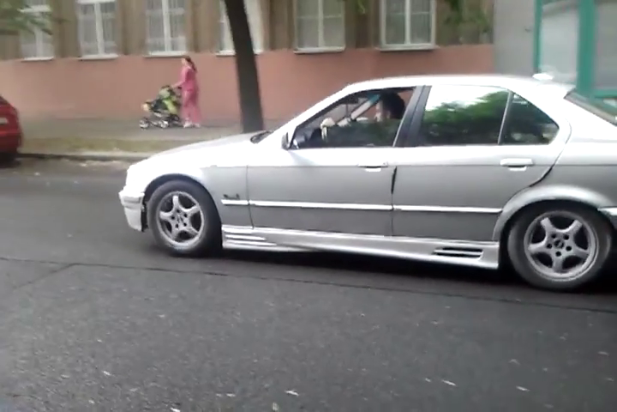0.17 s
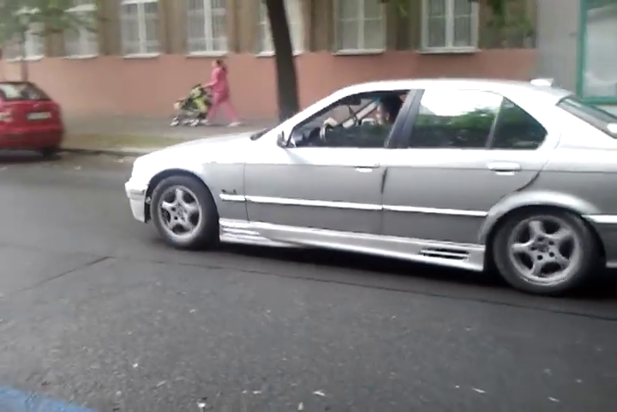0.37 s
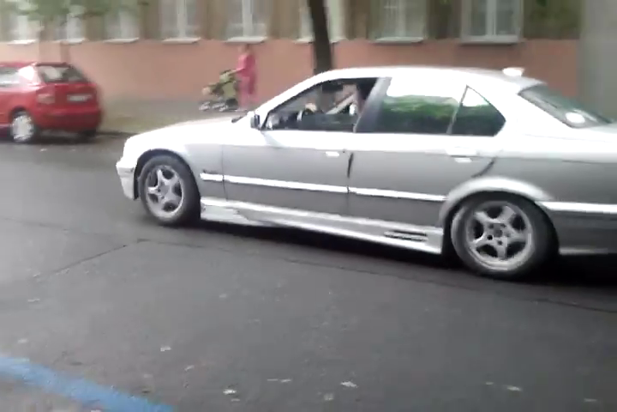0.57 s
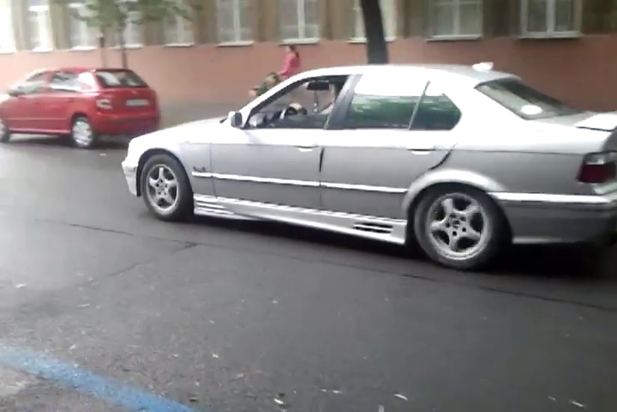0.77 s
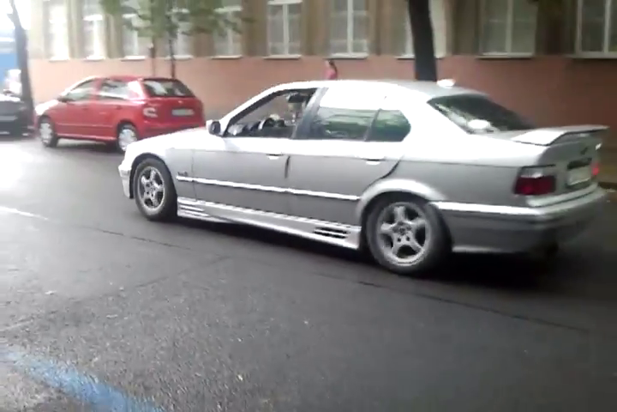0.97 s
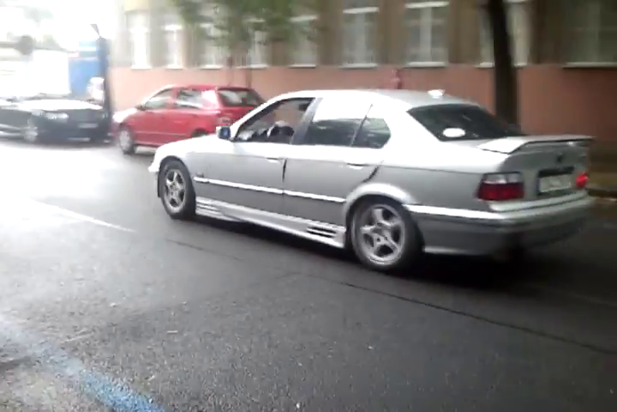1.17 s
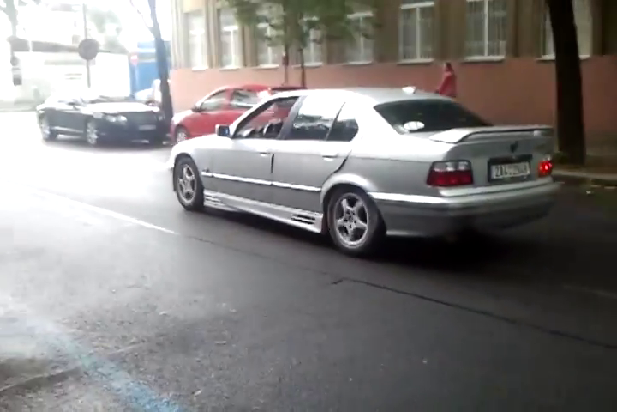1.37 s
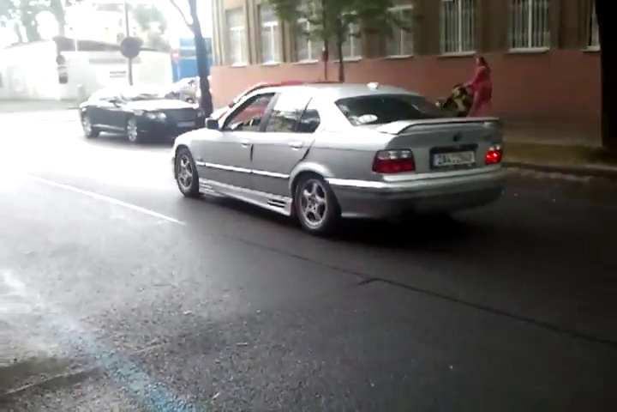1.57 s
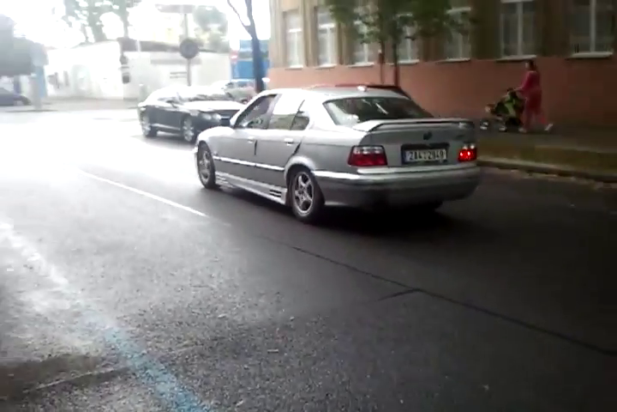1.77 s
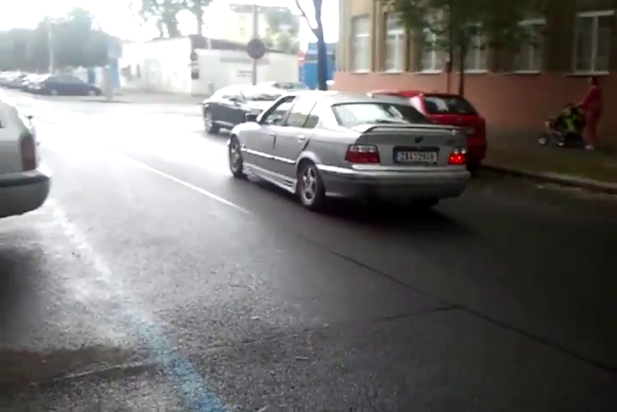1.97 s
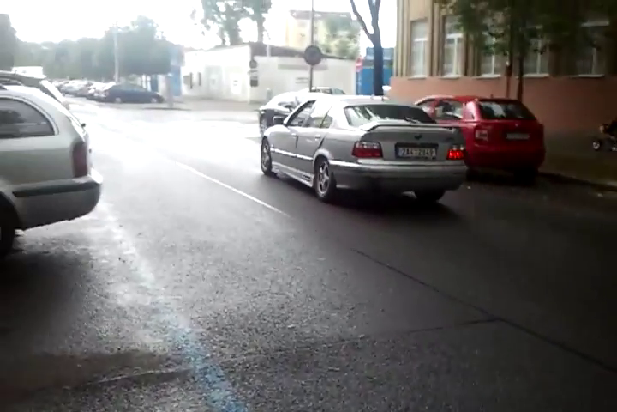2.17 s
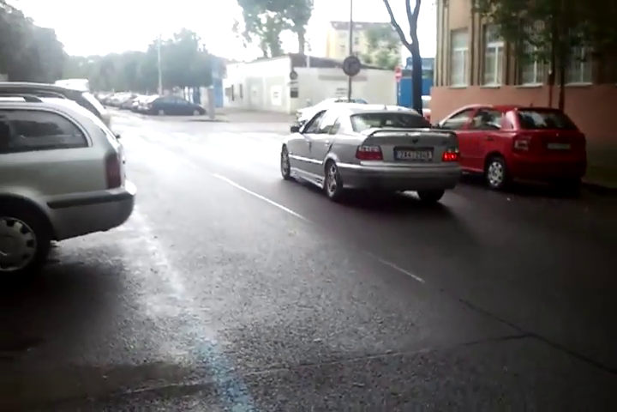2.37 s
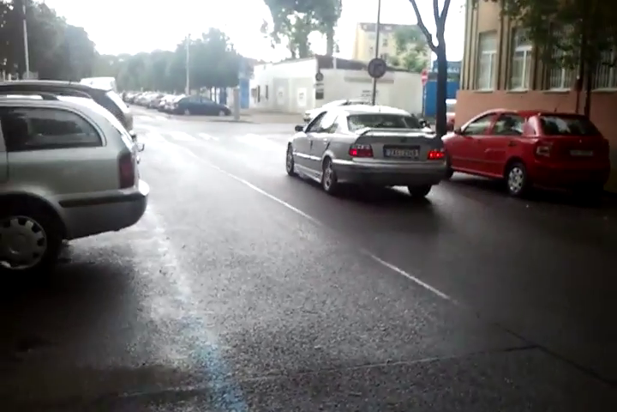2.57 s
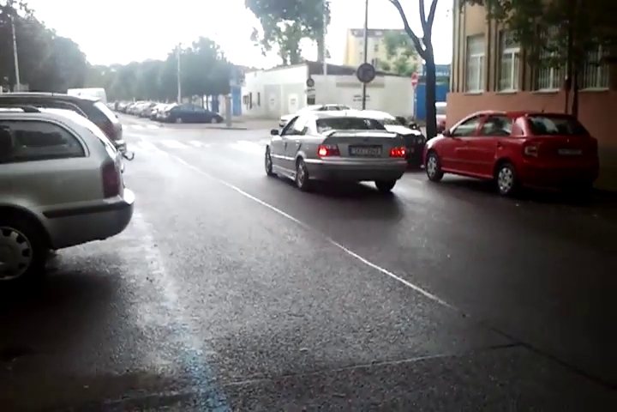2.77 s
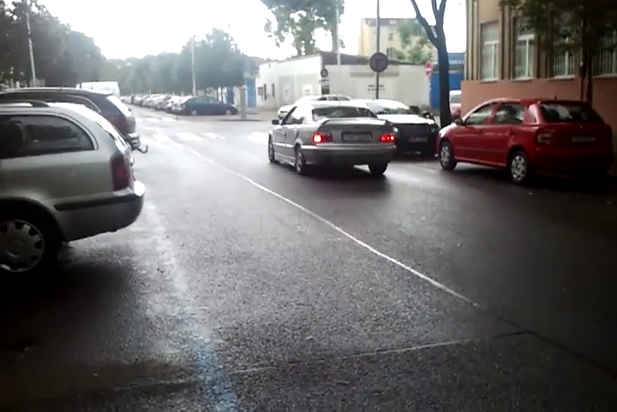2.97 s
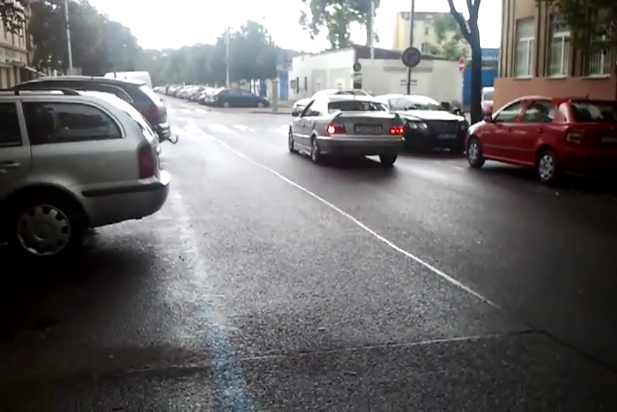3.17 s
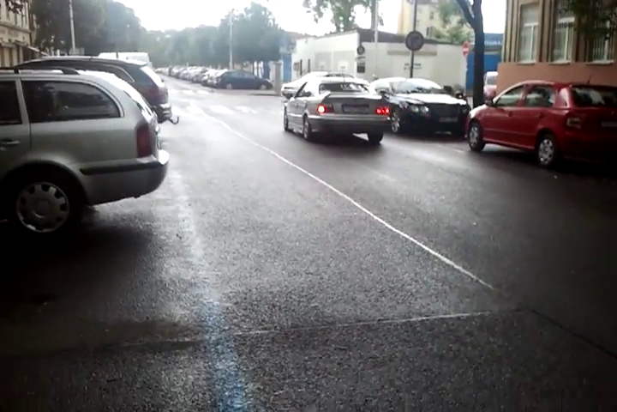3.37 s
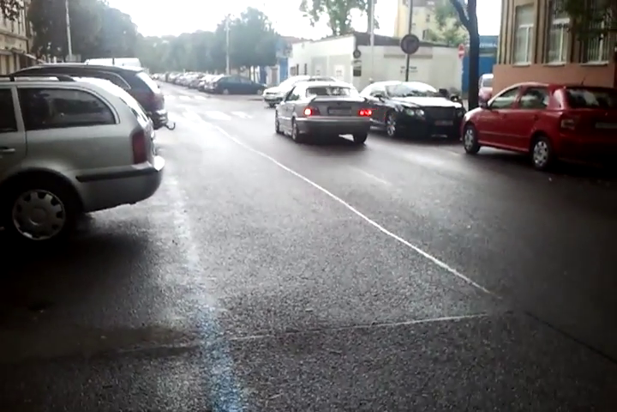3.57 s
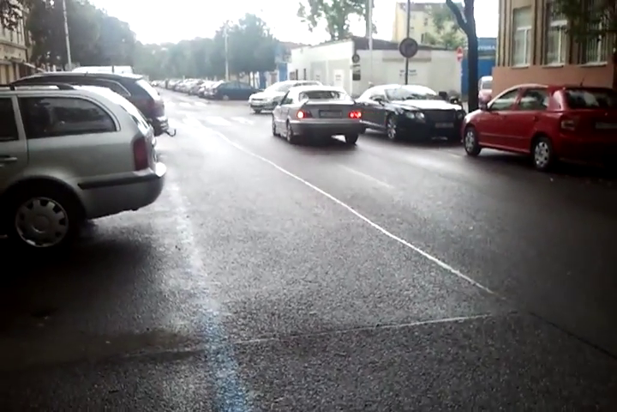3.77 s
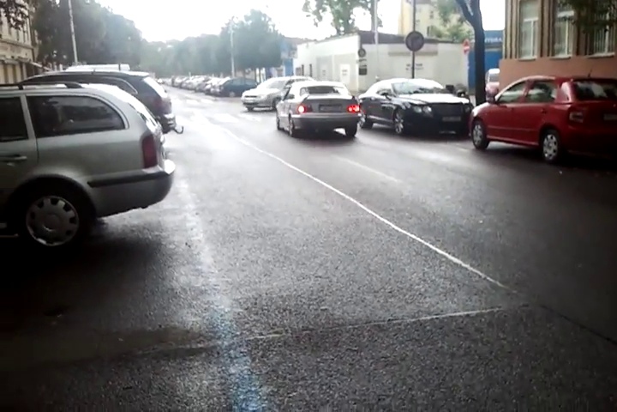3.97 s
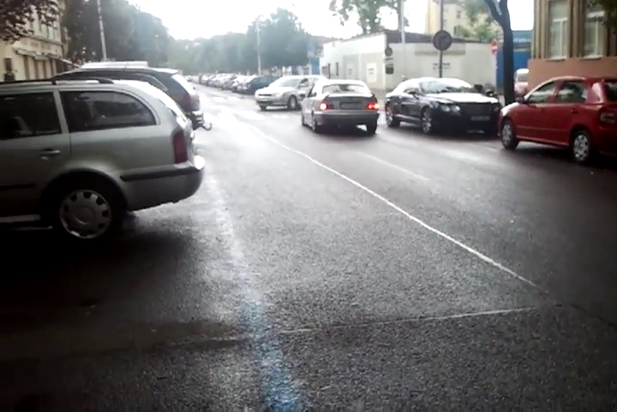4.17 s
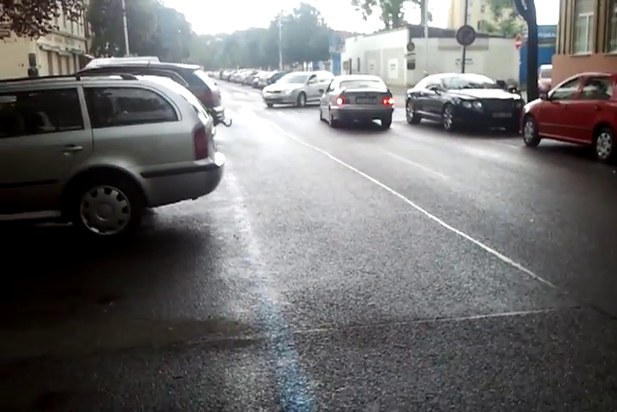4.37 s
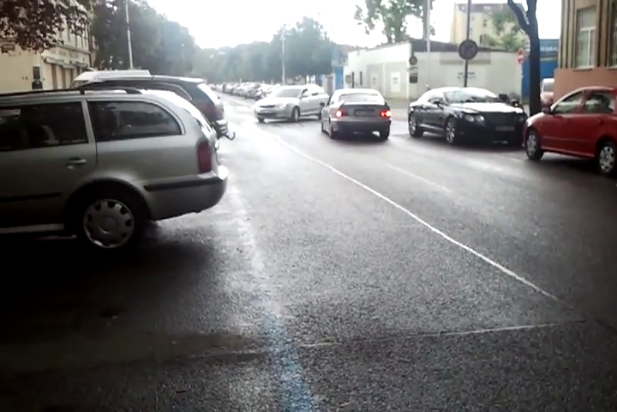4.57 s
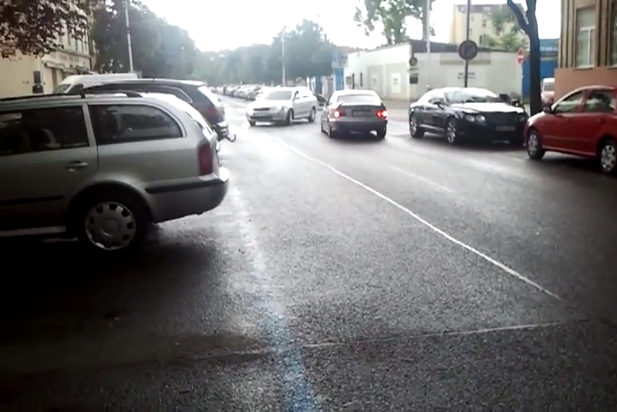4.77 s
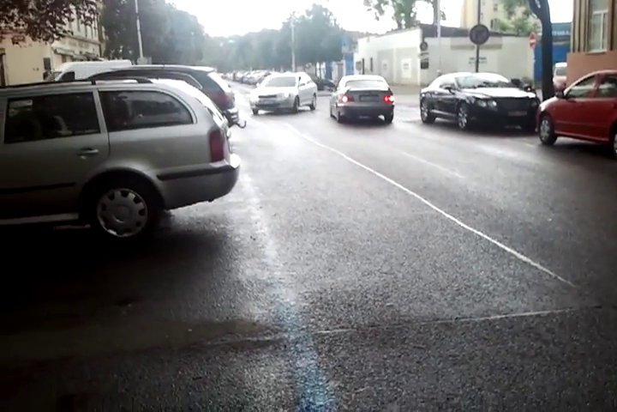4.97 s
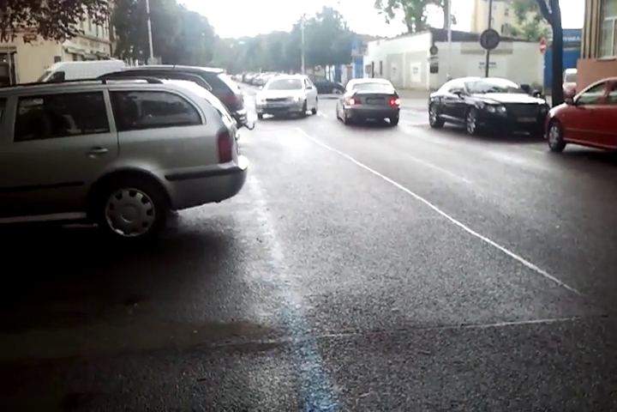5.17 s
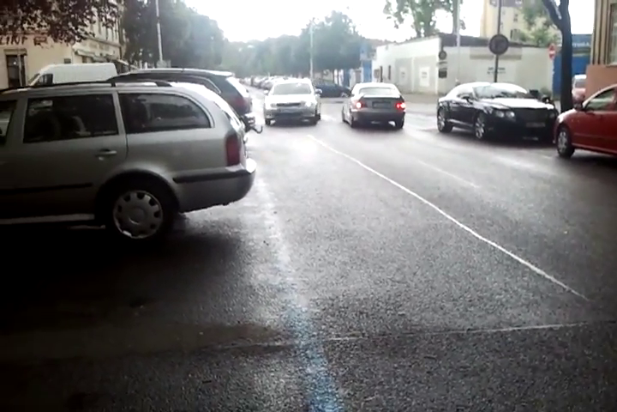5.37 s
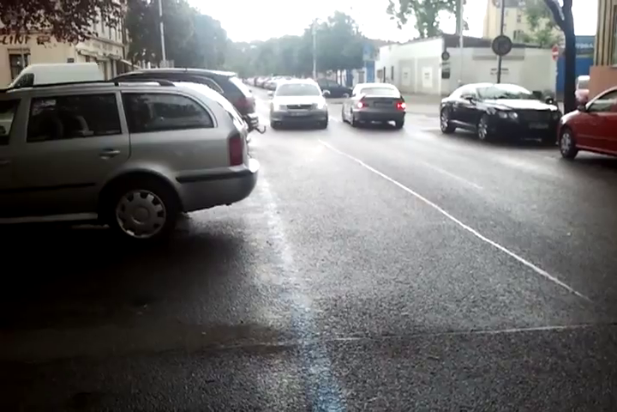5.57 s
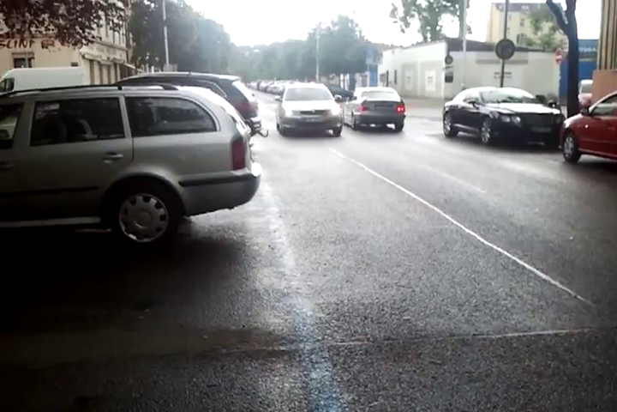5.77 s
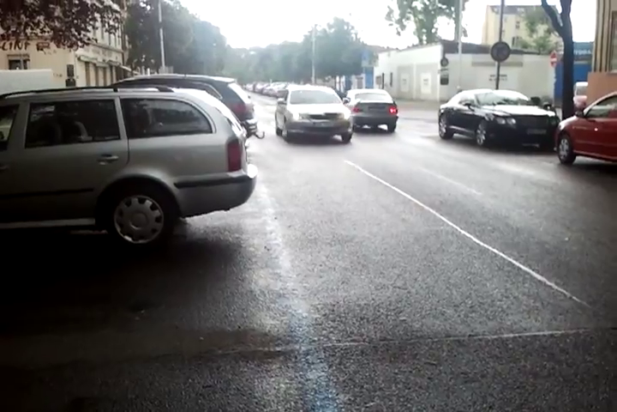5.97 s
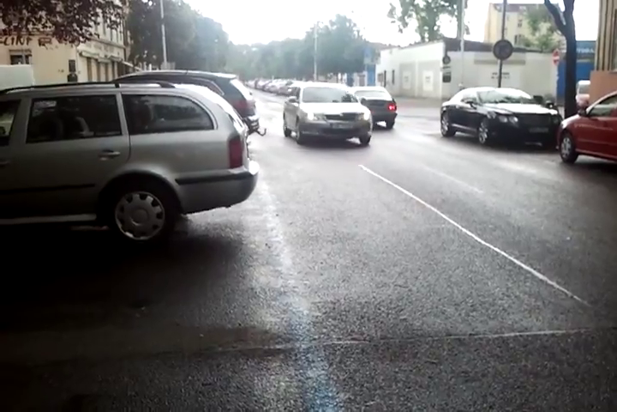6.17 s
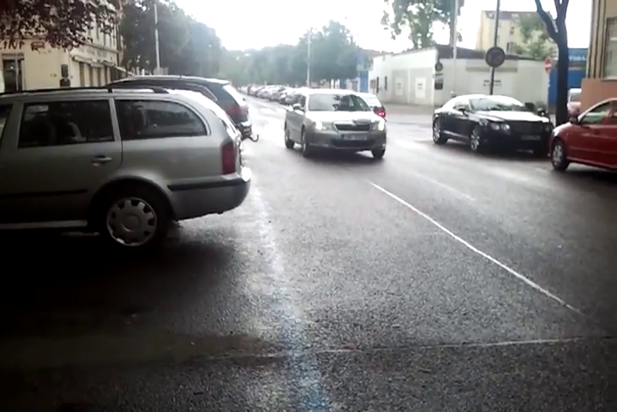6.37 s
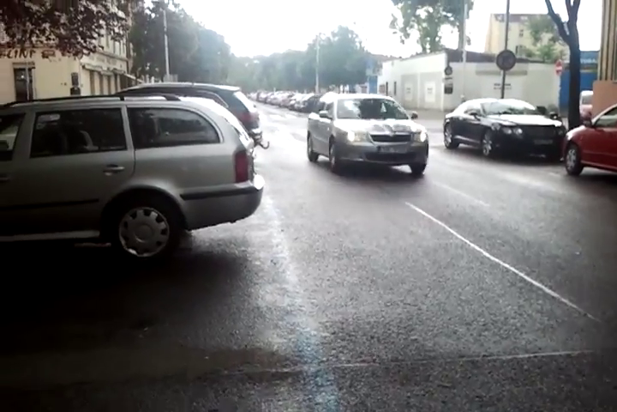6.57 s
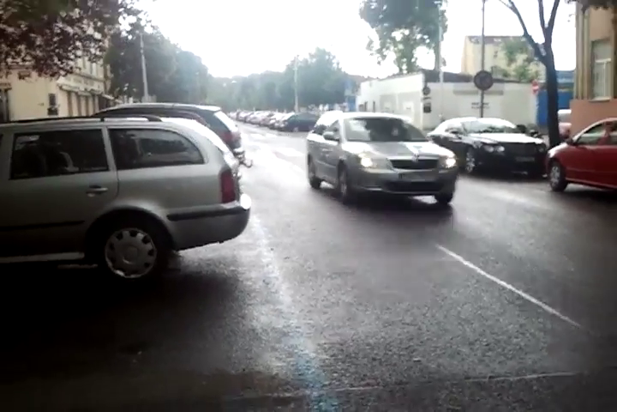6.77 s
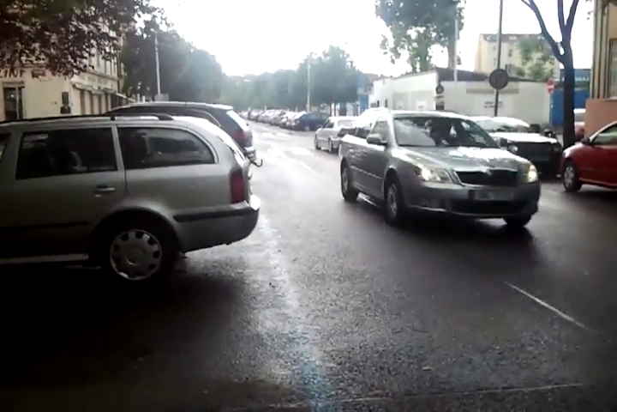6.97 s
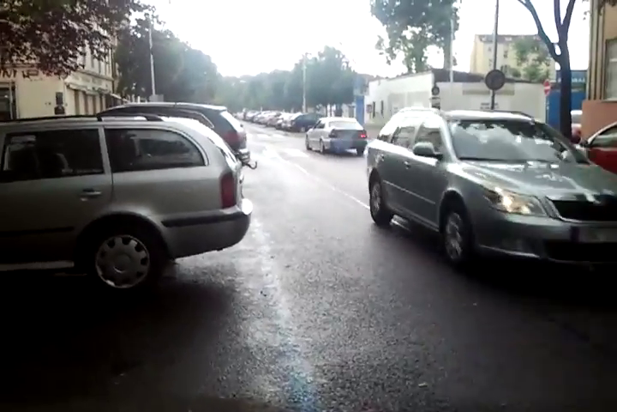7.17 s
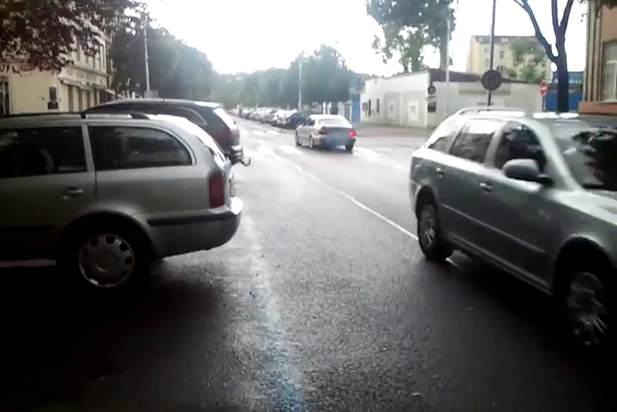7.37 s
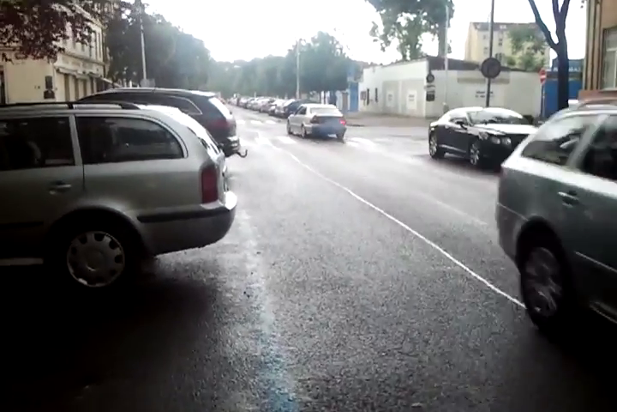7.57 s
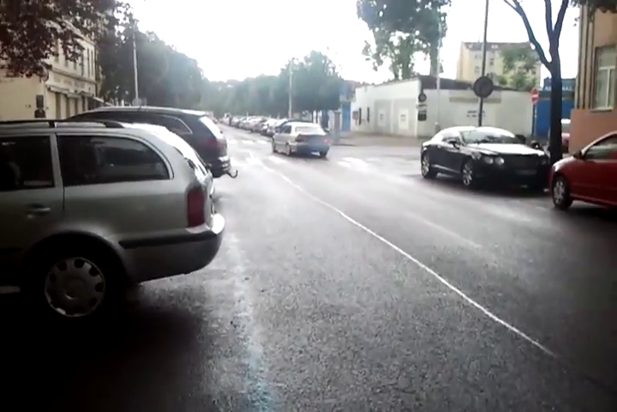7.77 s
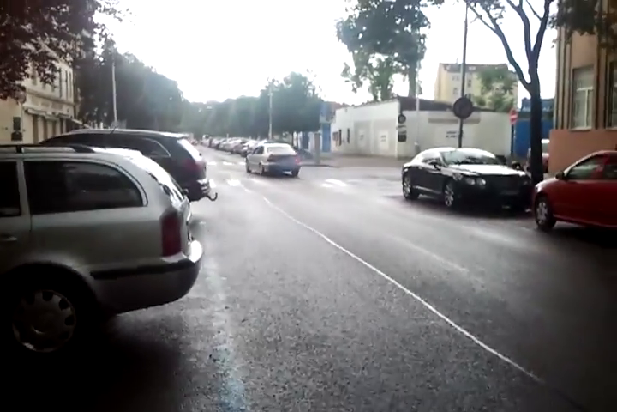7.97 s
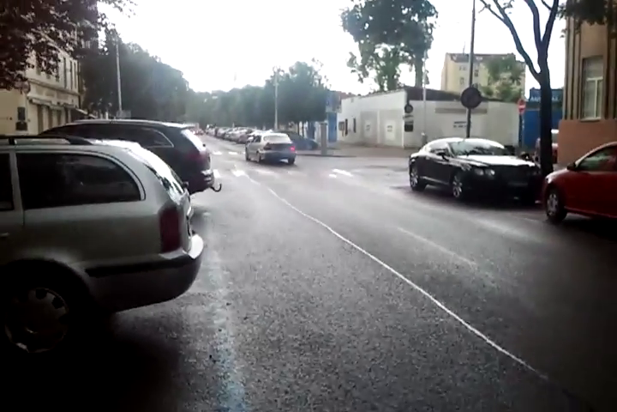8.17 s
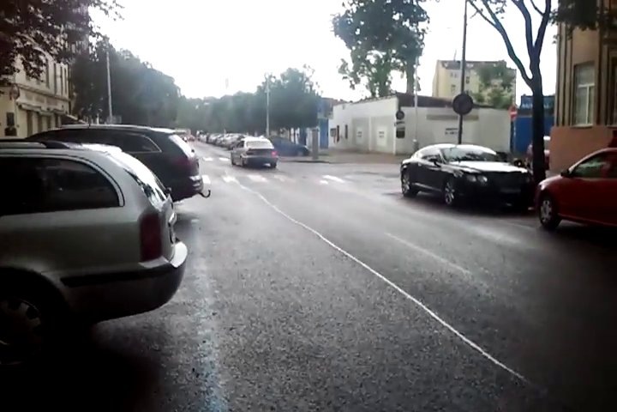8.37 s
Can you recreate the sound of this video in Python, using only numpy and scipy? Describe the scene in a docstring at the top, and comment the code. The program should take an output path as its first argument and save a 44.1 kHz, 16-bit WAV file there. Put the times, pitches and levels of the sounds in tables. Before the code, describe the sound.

A six-cylinder saloon with a loud, burbling exhaust pulls away down a wet street, coasts, then howls off at high revs as another car swishes past.

```python
"""A six-cylinder saloon with a loud exhaust pulls away down a wet city street: firing pulses ring its pipe,
its tyres fling spray, rough whines sound and distant traffic hums. Its firings turn uneven, it burbles and
pops in the tailpipe, and grit snaps under tyres; it coasts with a thin squeal while an oncoming car nears.
It revs up and pulls on at high revs in the distance, with a howl of engine orders, as the other car
swishes past, its engine tone sinking. Scattered echoes from the house fronts follow the exhaust."""
import sys
import numpy as np
from scipy import signal
from scipy.fft import rfft, irfft, next_fast_len
from scipy.io import wavfile
from scipy.ndimage import uniform_filter1d, map_coordinates

SR = 44100
rng = np.random.default_rng(int(sys.argv[2]) if len(sys.argv) > 2 else 0)


def transcribe(u):
    """Save the signal u as a 16-bit wav file named by the first command-line argument.

    u: samples, shape (n,) or (channels, n), limited to [-1, 1]; the rate is SR.
    q: integer samples, one column per channel.
    """
    v = np.clip(np.atleast_2d(u).T, -1, 1)
    q = np.round(v * 32767).astype(np.int16)
    wavfile.write(sys.argv[1], SR, q)


N = 371322
FLUTTER_DB = 2.8  # spread of the level flutter of the howl and the bank tones
FLUTTER_PER_S = 110  # new flutter values a second in the squeal and the hum


def from_db(db):
    """Decibel law: amplitude ratio of a level."""
    return 10 ** (np.asarray(db) / 20)


def rms(x):
    """Effective value: root of the mean power."""
    return np.sqrt(np.mean(x ** 2) + 1e-20)


def in_time(rows):
    """Linear interpolation: each column of a curve, sample by sample."""
    s, *columns = np.transpose(rows)
    return [np.interp(np.arange(N) / SR, s, c) for c in columns]


def cut(x, hz, kind, order=2):
    """Butterworth filtering: a maximally flat pass band."""
    sos = signal.butter(order, np.clip(hz, 5, .45 * SR), kind, fs=SR, output="sos")
    return signal.sosfilt(sos, x)


def drift(rate):
    """Slow random modulation: linear ramps between rate new values a second, spread 1."""
    knots = rng.standard_normal(size=4000)
    ramps = map_coordinates(knots, [np.arange(N) / SR * rate], order=1, mode="wrap")
    return ramps * np.sqrt(3 / 2)  # makes up the spread lost between the knots


def evened(x):
    """Level normalisation: the same sound held near rms 1 by its running power."""
    power = uniform_filter1d(uniform_filter1d(x ** 2, size=2600), size=1800)
    return x / np.sqrt(np.abs(power) + 1e-14)


def resonate(x, modes, flip=1):
    """Modal superposition: parallel resonances, the k-th weighted by flip to the power k."""
    out = 0
    for k, (hz, width, db) in enumerate(modes):
        r = np.exp(-np.pi * width / SR)
        poles = [1, -2 * r * np.cos(2 * np.pi * hz / SR), r * r]
        ringing = (1 - r * r) / 2 * signal.lfilter([1, 0, -1], poles, x)
        out = out + flip ** k * from_db(db) * ringing
    return out


def coloured(x, spectrum):
    """Spectral shaping: x weighted by a level curve over log frequency; rms 1."""
    hz, db = np.transpose(spectrum)
    size = next_fast_len(N + 4096)
    bins = np.maximum(np.arange(size // 2 + 1) * SR / size, 1)
    weight = from_db(np.interp(np.log(bins), np.log(hz), db))
    y = irfft(rfft(x, size) * weight, size)[:N]
    return y / rms(y)


def tone(curve, wobble, wobble_rate, flutter_db):
    """Frequency and amplitude modulation: a sine unsteady in pitch and level."""
    hz, db = in_time(curve)
    phase = 2 * np.pi * np.cumsum(hz * (1 + wobble * drift(wobble_rate))) / SR
    return np.sqrt(2) * from_db(db + flutter_db * drift(FLUTTER_PER_S)) * np.sin(phase)


def harmonic(multiple, turns):
    """Fourier component of the firing cycle; rms 1."""
    return np.sqrt(2) * np.cos(2 * np.pi * multiple * turns)


# Distance of the leaving car. Columns: start_s, distance (0 close to 1 far)
DISTANCE_CURVE = [(1.5, 0), (3, 0.4), (6, 1)]


def distance():
    """Recession of the source: a share that rises from 0 to 1."""
    return np.clip(in_time(DISTANCE_CURVE)[0], 0, 1)


# Engine speed: slipping the clutch, first gear, coasting, a blip that runs on into a long pull.
# Columns: start_s, firing_rate (firings per s, before the tremble)
ENGINE_SPEED = [(0.0, 86), (0.09, 94.7), (0.19, 95), (0.26, 87), (0.36, 79.6), (0.6, 61.3), (0.72, 62.7),
                (0.89, 87.5), (1.08, 85.5), (1.36, 100), (1.59, 102.6), (1.85, 117.6), (2.08, 107.5),
                (2.32, 108.6), (2.62, 104), (2.95, 89.5), (3.33, 88.5), (3.78, 77), (3.9, 60), (4.2, 70.5),
                (4.52, 75.8), (5.98, 75.2), (6.1, 87), (6.22, 96), (6.42, 127), (6.56, 168), (6.7, 188),
                (7.15, 196), (7.9, 213), (8.42, 229)]


def firing_rate():
    """Fundamental frequency of the exhaust: firings per second."""
    return in_time(ENGINE_SPEED)[0]


# Spells of uneven firing. Columns: start_s, end_s, added_unevenness (0-1)
ROUGH_SPANS = [(0.03, 0.354, 0.3), (0.715, 1.33, 0.27), (1.876, 3.034, 0.69), (3.337, 4.044, 0.38),
               (6.4, 7.083, 0.63)]


def unevenness(ramp_s=.14, steady=.1):
    """Combustion stability: firings are nearly even, but stumble in each rough spell; 0-1."""
    t = np.arange(N) / SR
    rough = 0
    for start, end, depth in ROUGH_SPANS:
        rough = rough + depth * np.clip(np.minimum(t - start, end - t) / ramp_s, 0, 1)
    return np.clip(steady + rough, 0, 1)


def crank(rate, uneven, jitter=.0048):
    """Phase accumulation: firings so far, at a speed that trembles by jitter, up to threefold if uneven."""
    tremble = jitter * (1 + 2 * uneven) * drift(45)
    return np.cumsum(rate * (1 + tremble)) / SR


def street(x, t60_s=.37, cut_hz=4800):
    """Diffuse reflection: dull, scattered echoes between the house fronts, as loud as x."""
    t = np.arange(SR) / SR
    sparse = rng.standard_normal(SR) * (rng.random(SR) < .02)
    echoes = sparse * (t > .018) * from_db(-60 * t / t60_s)
    y = signal.fftconvolve(x, cut(echoes, cut_hz, "low"))[:N]
    return y * rms(x) / rms(y)


def outdoors(x, far, echo_db=-6):
    """Direct-to-reverberant ratio: with distance the echoes gain; held near rms 1."""
    x = evened(x)
    return evened(x + np.maximum(far, .4) * from_db(echo_db) * street(x))


# Silencer chambers that delay the harmonics above them, which reshapes the pulse.
# Columns: centre_hz, width_hz
CHAMBER_RESONANCES = [(195, 68), (275, 94)]


def chamber_lag(hz):
    """Phase dispersion: lag of a tone after the silencer's chambers, in radians."""
    return sum(np.arctan2(hz * width, centre ** 2 - hz ** 2) for centre, width in CHAMBER_RESONANCES)


# What the silencer lets through of the lowest harmonics. Columns: pitch_hz, relative_level_db
SILENCER_PASS = [(60, -1.5), (80, 3), (100, 0.5), (116, 0.5), (125, -7), (152, -0.5), (172, -3.5),
                 (188, -5), (210, -1.5), (235, -4.5), (260, -18), (300, -12.5), (350, -14.5), (420, -30)]


def low_harmonics(rate, overtone_loss_db):
    """Transmission loss: gains of three harmonics sliding through the silencer; total power 1."""
    hz, db = np.transpose(SILENCER_PASS)
    gains = []
    for k in range(1, 4):
        passed_db = np.interp(np.log(k * rate), np.log(hz), db)
        gains.append(from_db(passed_db - (k > 1) * overtone_loss_db))
    gains = np.array(gains)
    return gains / np.sqrt(np.sum(gains ** 2, axis=0))


# High-rev tones at a half and at two thirds of the firing rate.
# Column: level_db (dB against the note, before fading)
UNDERTONE_LEVELS = [-13.5, -14]
# Far off, a note this far above the bark swells in the firing tone: overtones lose dB per dB, to a limit
SWELL_FROM_DB, SWELL_LOSS, SWELL_LIMIT_DB = 6.5, 2.1, 8.5
# Below these firing rates the far note's fundamental thins against its overtones, by up to so many dB
IDLE_HZ, IDLE_THIN_DB = (65, 72), 10


def boom(rate, turns, uneven, far, tail_on, rasp, note, bark_level, waver_db=4.5, fading_db=3.0):
    """Harmonic synthesis: the lowest harmonics waver when firings are uneven and fade in and out far off."""
    excess_db = SWELL_LOSS * (note - bark_level - SWELL_FROM_DB)
    swell_db = np.interp(far, [.45, .7], [0, 1]) * np.clip(excess_db, 0, SWELL_LIMIT_DB)
    thin_db = tail_on * np.interp(rate, IDLE_HZ, [IDLE_THIN_DB, 0])
    out = 0
    for k, gain in enumerate(low_harmonics(rate, swell_db - thin_db), 1):
        unrest_db = waver_db * uneven * drift(34) + fading_db * far * drift(13)
        phase = 2 * np.pi * k * turns - chamber_lag(k * rate)
        out = out + np.sqrt(2) * gain * from_db(unrest_db) * np.cos(phase)
    # unequal cylinders add subharmonics at high revs
    for share, db in zip((1 / 2, 2 / 3), UNDERTONE_LEVELS):
        out = out + rasp * from_db(db + fading_db * drift(3.3)) * harmonic(share, turns)
    return out


# Tailpipe resonances. Columns: pitch_hz, width_hz, level_db (dB before the sign-and-weight pattern)
PIPE_MODES = [(296, 21.2, 5.5), (425, 79, -5), (519, 82, 1.5), (635.7, 82, 6), (748, 73, 2),
              (1073, 84, -12.5)]
# Narrow standing waves of the pipe, heard once the car points its tail at the listener.
# Columns: pitch_hz, width_hz, level_db (dB before the sign-and-weight pattern)
TAIL_ON_MODES = [(267, 51, 7.5), (343, 20, 7), (460.4, 17.5, 1.5), (546.4, 53, 4), (657, 43.3, 5.5),
                 (722, 50, 1)]
# Firing strength of each cylinder. Column: relative_strength (widened below, more so when raspy)
CYLINDER_STRENGTHS = [0.79, -0.43, -0.75, 0.57, 0.86, -0.27]


def bark(turns, uneven, tail_on, rasp, puff_db=-12, low_hz=270, top_hz=1050, rasp_spread=1.6):
    """Source-filter principle: pulse edges and puffs of turbulence excite the resonances of the pipe."""
    firing = np.round(turns).astype(int)
    cylinder = np.take(CYLINDER_STRENGTHS, firing, mode="wrap")
    chance = rng.standard_normal(2000)[firing]
    strength = from_db(cylinder * (2.5 + rasp_spread * rasp)) * (1 + uneven * chance)
    # the higher harmonics make up the sharp edge of the pulse
    pulses = sum(np.cos(2 * np.pi * k * turns) for k in range(4, 17))
    # gas rushes just after each valve opens
    rush = rng.standard_normal(N) * np.exp(-2.8 * (turns % 1))
    puffs = cut(rush, (450, 1500), "band", order=3)
    puff_level = from_db(puff_db) * (.5 + 7.5 * uneven)
    flow = strength * (pulses / rms(pulses) + puff_level * puffs / rms(puffs))
    side_on = resonate(flow, PIPE_MODES, flip=-0.71)
    behind = resonate(flow, TAIL_ON_MODES, flip=-0.954)
    pipe = (1 - tail_on) * side_on + tail_on * behind
    return cut(cut(pipe, low_hz, "high", order=4), top_hz, "low", order=3)


# Silencer resonances in which uneven firings rumble. Columns: pitch_hz, width_hz, relative_level_db
RUMBLE_MODES = [(57.3, 20, -9.5), (94, 51, 5.5), (169.5, 16, 1), (203.4, 20, 2)]


def burble(turns, band_hz=(48, 270)):
    """Random impulse excitation: strong and weak firings fill the gaps between harmonics with rumble."""
    firing = np.round(turns).astype(int)
    misfires = np.diff(firing, prepend=0) * rng.standard_normal(2000)[firing]
    return cut(resonate(misfires, RUMBLE_MODES), band_hz, "band", order=3)


# Deep exhaust note. Columns: start_s, level_db (dB before trim)
NOTE_LEVEL = [(0.0, -12.5), (0.15, -19), (0.23, -19.5), (0.33, -11), (0.62, -18), (0.84, -13), (0.95, -16),
              (1.2, -15), (1.33, -13), (1.55, -12), (1.78, -14.5), (1.92, -14), (2.06, -24.5), (2.55, -28),
              (2.97, -34.5), (3.07, -26), (3.3, -28), (3.85, -41), (4.0, -34), (4.28, -31.5), (4.66, -27),
              (5.07, -35.5), (6.0, -36), (6.08, -21.5), (6.23, -19), (6.28, -29.5), (6.42, -16.5),
              (6.48, -28.5), (6.62, -30), (7.0, -37), (7.11, -29.5), (7.24, -32), (7.32, -51),
              (7.39, -29.5), (7.65, -29), (8.28, -26.5), (8.42, -31.5)]
# Tailpipe bark, which follows the throttle. Columns: start_s, level_db (dB before trim and rasp)
BARK_LEVEL = [(0.03, -33), (0.24, -35.5), (0.43, -23), (0.7, -38), (0.8, -25), (0.92, -29.5), (1.27, -33.5),
              (1.41, -22), (1.81, -16), (2.18, -30.5), (2.3, -29.5), (2.86, -43.5), (3.49, -39),
              (3.82, -55), (4.14, -41.5), (6.14, -46), (6.3, -27.5), (6.55, -37.5), (7.5, -27.5),
              (8.42, -26)]
RASP_HZ = (134, 180.4)  # between these firing rates the note turns raspy
# Burble against the firing tones: when the firings are even, and what full unevenness adds
BURBLE_EVEN_DB, BURBLE_RISE_DB = -21, 27.5


def exhaust(note_trim_db=1.28, bark_trim_db=-2.0, rasp_db=-9):
    """Superposition: boom and burble share the deep note; bark, bank tones and howl lie above it."""
    rate, uneven, far = firing_rate(), unevenness(), distance()
    note, bark_level = in_time(NOTE_LEVEL)[0], in_time(BARK_LEVEL)[0]
    rasp = np.interp(rate, RASP_HZ, [0, 1])
    tail_on = np.clip(2 * far, 0, 1)
    turns = crank(rate, uneven)
    firing_tones = boom(rate, turns, uneven, far, tail_on, rasp, note, bark_level)
    lumps = outdoors(burble(turns), far)
    lump_gain = from_db(BURBLE_EVEN_DB + BURBLE_RISE_DB * uneven)
    deep = (firing_tones + lump_gain * lumps) / np.sqrt(1 + lump_gain ** 2)
    pipe = outdoors(bark(turns, uneven, tail_on, rasp), far) * from_db(rasp_db * rasp)
    upper = pipe + bank_tones(turns) + rasp * howl(turns)
    return deep * from_db(note + note_trim_db) + upper * from_db(bark_level + bark_trim_db)


# Narrow rings in the swish. Columns: pitch_hz, width_hz, level_db (dB before trim)
RING_MODES = [(732, 26, -2), (1190, 180, -3.5), (1716, 113, -2), (1900, 32, -7), (2553, 20, -4.5),
              (4970, 90, -5.5), (6120, 240, -5.5)]
# The swish also bounces off the parked cars; the detour lengthens as the cars roll on
BOUNCE_DB, BOUNCE_S, BOUNCE_S_PER_S = -10, .007, .00004


def tyres(roar_level, spray_level, colour, roar_band, splash_db, ring_db):
    """Comb-filtered noise: tread roar below, flung water above; the spray comes in uneven splashes."""
    t, white = np.arange(N) / SR, rng.standard_normal(N)
    bounce = map_coordinates(white, [(t - BOUNCE_S - BOUNCE_S_PER_S * t) * SR], order=3)
    noise = coloured(white + from_db(BOUNCE_DB) * bounce, colour)
    noise = noise + from_db(ring_db) * resonate(noise, RING_MODES)
    roar = cut(noise, 3300, "low", order=3)
    spray = cut(noise, 3300, "high", order=3)
    roar = roar / rms(cut(roar, roar_band, "band", order=4))  # level refers to this band
    splashes = from_db(splash_db * (drift(350) + 0.77 * drift(35)))
    spray = spray / rms(spray) * splashes
    return roar * from_db(roar_level + 1.05 * drift(40)) + spray * from_db(spray_level)


def oncoming_share():
    """Linear power crossfade: share of the oncoming car's tyres in the swish."""
    return np.clip((np.arange(N) / SR - 3.8) / .5, 0, 1)


# Tyres of the leaving car. Columns: start_s, roar_level_db, spray_level_db (dB before trim)
LEAVING_LEVELS = [(0.03, -33, -30.5), (0.61, -37.5, -34), (0.63, -39.5, -33), (0.85, -35.5, -32),
                  (1.91, -34, -37.5), (2.11, -41.5, -51.5), (2.36, -39, -48.5), (2.94, -46.5, -55.5),
                  (3.7, -49.5, -58.5), (4.2, -51.5, -57)]
# Their colour. Columns: pitch_hz, relative_level_db (dB per Hz)
LEAVING_SPECTRUM = [(500, 6), (850, -4.5), (1100, 0.5), (1900, -5.5), (3300, -6), (4600, 0), (7400, 5),
                    (9700, -3), (15000, -32.5)]
# Wheels run through puddles. Columns: centre_s, added_spray_db
PUDDLE_SPLASHES = [(.74, 5), (2.38, 6), (2.49, 9.5), (2.6, 9)]


def leaving_tyres(throb_db=-1.0, puddle_s=0.017):
    """Amplitude modulation: close by, the hiss throbs at the firing rate; puddles swell the spray."""
    t = np.arange(N) / SR
    roar, spray = in_time(LEAVING_LEVELS)
    puddles = sum(db * np.exp(-.5 * ((t - s) / puddle_s) ** 2) for s, db in PUDDLE_SPLASHES)
    throb = throb_db * (1 - distance()) * np.cos(2 * np.pi * np.cumsum(firing_rate()) / SR)
    swish = tyres(roar - 2.5, spray - 1.0 + puddles + throb, LEAVING_SPECTRUM, (1000, 2800),
                  splash_db=1.5, ring_db=-3.5)
    return np.sqrt(1 - oncoming_share()) * swish


# Rough whines, the last one the octave of the thin squeal.
# Columns: start_s, end_s, start_pitch_hz, end_pitch_hz, level_db
WHINE_GLIDES = [(-.2, 0.434, 1735, 1635, -41), (-.2, 0.614, 1418, 1416, -43),
                (0.734, 1.274, 1417, 1434, -40), (0.72, 1.345, 2070, 2070, -48),
                (1.26, 2.057, 1710, 1706, -40), (2.155, 2.661, 1366, 1275, -41.5),
                (2.208, 2.75, 2000, 1926, -55), (5.138, 6.028, 3170, 3280, -56.5)]


def whines(fade_s=0.16, clean_share=0.25, width_at_1500_hz=60):
    """Narrow-band noise: with a weak tone inside, each whine breaks up as it swells and fades."""
    t, out = np.arange(N) / SR, 0
    for start, end, from_hz, to_hz, db in WHINE_GLIDES:
        phase = 2 * np.pi * np.cumsum(np.interp(t, [start, end], [from_hz, to_hz])) / SR
        width = width_at_1500_hz * from_hz / 1500  # grows with the pitch
        fuzz = drift(width) * np.cos(phase) + drift(width) * np.sin(phase)
        swell = np.clip(np.minimum(t - start, end - t) / fade_s, 0, 1)
        rough = np.sqrt(2 * clean_share) * np.cos(phase) + np.sqrt(1 - clean_share) * fuzz
        out = out + from_db(db) * swell * rough
    return out


# Distant traffic. Columns: pitch_hz, relative_level_db (dB per Hz)
CITY_SPECTRUM = [(20, -20), (48, 3), (110, 0.5), (220, 2.5), (420, -12), (650, -5), (880, -27), (1150, -17),
                 (2500, -43), (5000, -100)]


def city(level_db=-39):
    """Stationary noise: distant traffic as a steady low hum of shaped noise."""
    return from_db(level_db) * coloured(rng.standard_normal(N), CITY_SPECTRUM)


# Single hard firings. Columns: start_s, peak_level_db
POP_TIMES = [(0.827, -22), (2.113, -27), (2.286, -23), (2.362, -31), (4.175, -29), (4.292, -33),
             (4.340, -29)]


def pops(length_s=0.0035, top_hz=680):
    """Impulse response: a short burst of gas rings the tailpipe."""
    t, out = np.arange(SR // 10) / SR, np.zeros(N)
    for s, db in POP_TIMES:
        burst = rng.standard_normal(len(t)) * np.exp(-t / length_s)
        pop = cut(resonate(burst, PIPE_MODES), top_hz, "low", order=5)
        start = int(s * SR)
        out[start:start + len(t)] += from_db(db) * pop / np.abs(pop).max()
    return out


# Tones between the harmonics. Columns: multiple (of the firing rate), level_db (dB against the bark)
BANK_MULTIPLES = [(5 / 2, 1.9), (7 / 2, -2.2), (9 / 2, -1)]
# Coasting. Columns: start_s, share (0-1)
COASTING_SHARE = [(2.3, 0), (3.4, 1), (5.9, 0.8), (6.3, 0.17)]


def bank_tones(turns, top_hz=350):
    """Interharmonics: off the throttle the two cylinder banks blow unequally."""
    banks = 0
    for multiple, db in BANK_MULTIPLES:
        banks = banks + from_db(db + FLUTTER_DB * drift(13)) * harmonic(multiple, turns)
    return cut(banks, top_hz, "low", order=10) * np.clip(in_time(COASTING_SHARE)[0], 0, 1)


# Grit snapping under the tyres. Columns: start_s, level_db (dB before trim)
GRIT_TIMES = [(2.635, -29), (2.787, -41), (3.441, -34)]


def grit(decay_s=0.0025, trim_db=-9, crack_hz=(3500, 11000)):
    """Exponential decay: small stones crack as brief bursts of high noise."""
    t, blows = np.arange(N) / SR, 0
    for s, db in GRIT_TIMES:
        blows = blows + from_db(db + trim_db) * (t >= s) * np.exp(-np.abs(t - s) / decay_s)
    crack = cut(rng.standard_normal(N), crack_hz, "band")
    return blows * crack / rms(crack)


# Tyres of the oncoming car as it nears and goes by.
# Columns: start_s, roar_level_db, spray_level_db (dB before trim)
ONCOMING_LEVELS = [(4.4, -56.5, -58), (6.0, -51, -52.5), (6.58, -45, -45.5), (6.78, -40, -39.5),
                   (7.28, -37, -37), (7.4, -36, -32.5), (8.0, -33, -31), (8.42, -35.5, -32.5)]
# Their colour. Columns: pitch_hz, relative_level_db (dB per Hz)
ONCOMING_SPECTRUM = [(25, -25), (140, -15.5), (350, -15.5), (750, -12.5), (920, -16.5), (1700, -21),
                     (2700, -20.5), (3900, -19.5), (5000, -17), (7500, -13.5), (10000, -23), (15000, -43)]


def oncoming_tyres():
    """Level change with approach: the swish swells as the car nears and goes by."""
    roar, spray = in_time(ONCOMING_LEVELS)
    swish = tyres(roar - 1.0, spray + 1.5, ONCOMING_SPECTRUM, (1900, 2800), splash_db=0.66, ring_db=4.0)
    return np.sqrt(oncoming_share()) * swish


# Thin squeal while coasting. Columns: start_s, pitch_hz, level_db (pitch and level before wobble)
SQUEAL_CURVE = [(4.58, 1650, -75), (4.66, 1650, -57), (5.1, 1630, -60), (5.22, 1622, -51),
                (5.76, 1628, -46.5), (6.0, 1670, -42), (6.08, 1830, -41.5), (6.25, 1900, -72)]


def squeal():
    """Frequency modulation: fast random pitch wobble roughens a thin tone."""
    return tone(SQUEAL_CURVE, wobble=0.008, wobble_rate=450, flutter_db=2.6)


# Howl at high revs. Column: order (cycles per round of all six cylinders)
HOWL_CYCLES = [15, 16, 18, 20, 21, 24]
# Levels of these orders. Column: level_db (dB against the bark, before flutter and pass band)
HOWL_LEVELS = [-5.5, -15, -5.5, -21, -4, -7]


def howl(turns, band_hz=(545, 810)):
    """Order resonance: clear engine orders sing as they climb through the tailpipe's pass band."""
    orders = 0
    for cycles, db in zip(HOWL_CYCLES, HOWL_LEVELS):
        level = from_db(db + FLUTTER_DB * drift(12))
        orders = orders + level * harmonic(cycles / len(CYLINDER_STRENGTHS), turns)
    return cut(orders, band_hz, "band", order=5)


# Engine of the oncoming car. Columns: start_s, pitch_hz, level_db (pitch and level before wobble)
HUM_CURVE = [(7.05, 74.5, -66), (7.3, 71, -38), (7.5, 61.8, -35.5), (7.85, 47.7, -48), (8.42, 46.3, -46)]


def passing_hum():
    """Falling pitch: the oncoming engine's unsteady tone sinks as it goes by."""
    return tone(HUM_CURVE, wobble=0.061, wobble_rate=16, flutter_db=1.0)


def widened(x, side_db=-22, above_hz=1700, lag_s=0.0047):
    """Stereo widening: a faint late copy makes the treble differ a little between left and right."""
    t = np.arange(N) / SR
    late = np.interp(t - lag_s, t, x, left=0)
    side = from_db(side_db) * cut(late, above_hz, "high", order=4)
    return np.array([x + side, x - side])


def scene():
    """Linear superposition: all sources reach one spot at the roadside."""
    leaving_car = exhaust() + leaving_tyres() + pops()
    oncoming_car = oncoming_tyres() + passing_hum()
    return widened(leaving_car + whines() + city() + grit() + squeal() + oncoming_car)


def record(dry, cutoff_hz=15650):
    """Clipping and band limitation: peaks stop at full scale, then the top is cut."""
    low_pass = signal.ellip(10, .1, 80, cutoff_hz, fs=SR, output="sos")
    return signal.sosfilt(low_pass, np.clip(dry, -1, 1))


dry = scene()
out = record(dry)
transcribe(out)
```